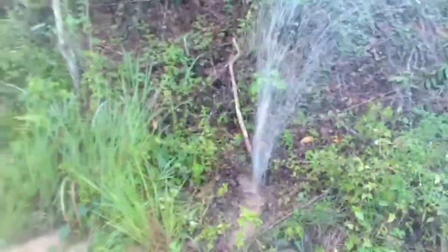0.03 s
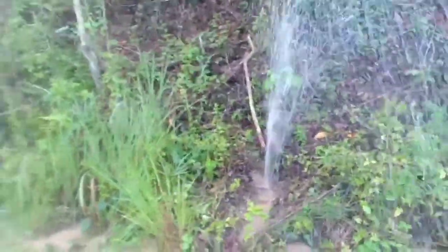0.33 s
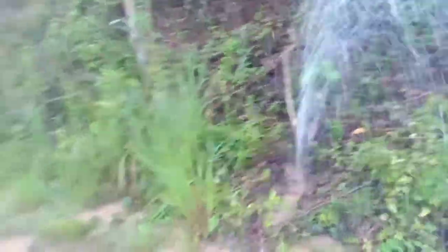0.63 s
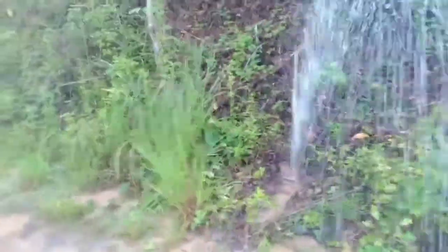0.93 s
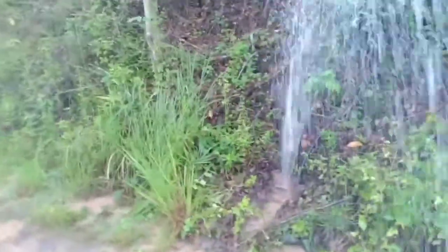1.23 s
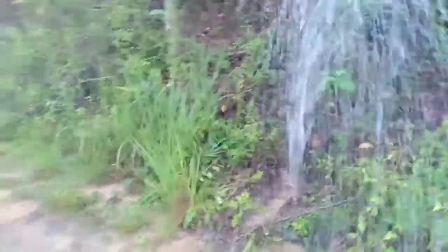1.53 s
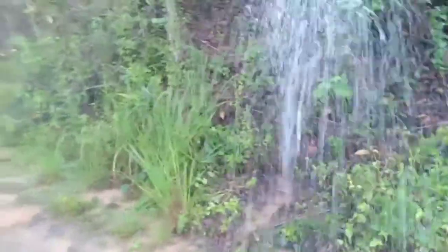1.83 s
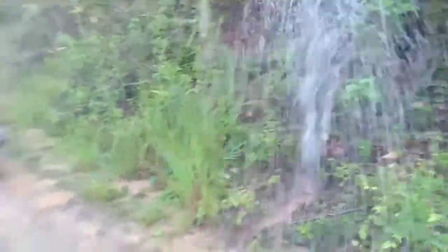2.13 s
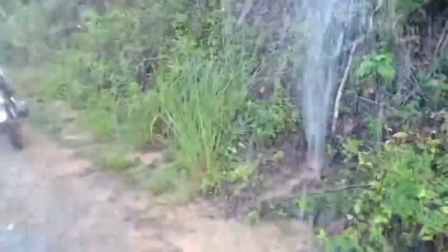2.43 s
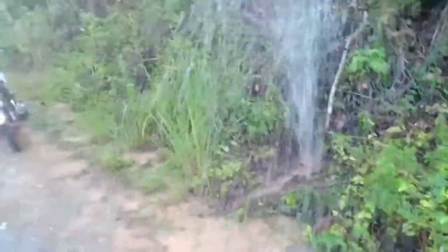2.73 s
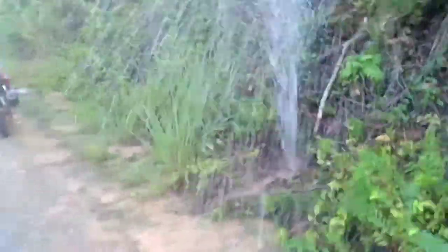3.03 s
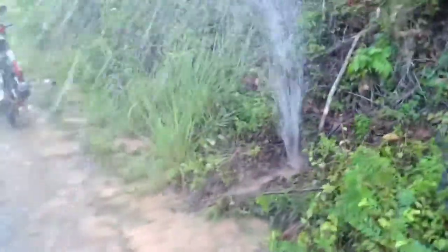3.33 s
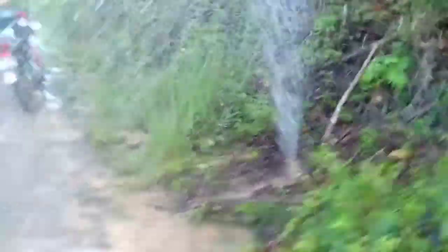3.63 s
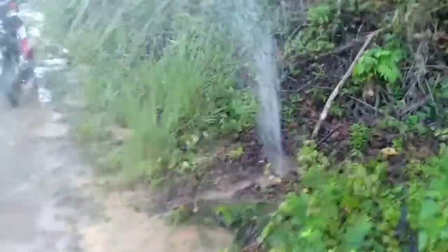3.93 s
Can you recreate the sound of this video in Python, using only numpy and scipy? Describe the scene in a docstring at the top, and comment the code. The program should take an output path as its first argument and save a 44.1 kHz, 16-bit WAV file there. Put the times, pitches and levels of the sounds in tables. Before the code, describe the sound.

A jet of water from a burst pipe hisses continuously outdoors, its spray splattering on plants and ground. Scattered droplets strike the hand-held microphone with short, sharp ticks, and the fine fizz drifts slightly from left to right.

```python
"""Spray from a broken pipe

Water jets from a broken pipe beside a dirt road: it hisses, and patters down on leaves and soil.
Stray drops strike the hand-held camera by its two microphone ports, which ring briefly.
As the camera turns, the finest fizz drifts to the right and the low rush to the left.
Three scuffs excite the modes of its case, and a faint low tone slides down once."""
import sys
import numpy as np
from scipy import signal
from scipy.fft import rfft, irfft, next_fast_len
from scipy.io import wavfile
from scipy.ndimage import map_coordinates

SR = 44100
rng = np.random.default_rng(int(sys.argv[2]) if len(sys.argv) > 2 else 0)


def generate_wav(signal):
    """Clip the signal to [-1, 1] and save it as 16-bit WAV at the path in sys.argv[1]."""
    frames = np.transpose(np.atleast_2d(signal))
    scaled = np.clip(frames, -1, 1) * 32767
    pcm = np.round(scaled).astype(np.int16)
    wavfile.write(sys.argv[1], SR, pcm)


N = 176400

# response of the two ports to close spray: frequency_hz, left_relative_db, right_relative_db
PORT_RESPONSE = [(98, -37, -47), (670, -28, -21), (1390, -14, -19), (1880, -3.5, -9), (2470, 1.5, -6),
                 (3830, -3.5, -5.5), (4490, -8.5, -3.5), (5230, 0, 3.5), (5890, 1.5, 0), (6920, -6, -7.5),
                 (7600, -11.5, -10.5), (10130, -13.5, -13.5), (11600, -8, -18), (12300, -12, -11.5),
                 (13700, -5, -13.5), (14300, -8.5, -9.5), (15800, -13.5, -11)]
# spectrum of the jet and of water on soil: frequency_hz, relative_db
RUSH_SPECTRUM = [(25, -9), (60, -20), (100, -15), (150, -8), (220, -0.5), (370, 1), (600, -3.5), (1000, -5),
                 (1600, -11.5), (3000, -35)]
# likeness of the rush at the two ports: frequency_hz, correlation
RUSH_COHERENCE = [(60, 0.76), (200, 0.98), (400, 0.99), (700, 0.94), (1500, 0.38)]
# flurries of small droplets on the camera: centre_s, half_length_s, level_db
FLURRY_SWELLS = [(0.123, 0.013, -28.5), (0.476, 0.045, -34), (1.856, 0.045, -34.5)]
# large drops on the camera: time_s, tap_relative_db, pitch_hz, splash_relative_db
DROP_IMPACTS = [(0.084, -10.5, 2410, -35), (0.1987, 0, 2500, -28), (.278, -8, 2620, -28.5),
                (.348, -13, 2950, -38.5), (0.363, -11, 2520, -44), (0.4298, -13.5, 2700, -42),
                (0.4377, -16, 2620, -36), (.4555, -10, 2540, -33), (0.4744, -12.5, 2410, -31),
                (0.4827, -18, 2530, -30), (.5014, -16, 2930, -18), (.509, -16, 2400, -26),
                (0.6125, -14, 2520, -22), (.6712, -21, 2840, -28), (0.7232, -7, 2760, -29),
                (0.7566, -6.5, 2520, -39), (1.142, -9.5, 2520, -28.5), (1.3004, -14.5, 2340, -32),
                (1.481, -8, 2110, -42), (1.4855, -11, 2770, -39), (1.4926, -5, 2410, -35),
                (1.518, -10, 2430, -41), (1.548, -23, 2300, -23), (1.551, -9.5, 2030, -35),
                (1.569, -10, 2060, -32), (1.582, -9.5, 2460, -27.5), (1.5947, -11, 2740, -33),
                (1.662, -12, 2910, -38), (1.665, -9, 2940, -31), (1.7096, -3.5, 2380, -27),
                (1.7195, -10.5, 2260, -37), (1.9482, -10.5, 2900, -37), (2.079, -16, 2900, -32),
                (2.0994, -22, 2830, -27), (2.263, -3.5, 2900, -21), (2.282, -4.5, 2040, -25.5),
                (2.3094, -10, 1720, -31), (2.3328, -9.5, 1970, -36), (2.3495, -8, 2680, -35),
                (2.3588, -9, 2570, -38), (2.3699, -4.5, 2500, -37), (2.3904, -7.5, 2550, -37),
                (2.4137, -15, 2700, -29), (2.4232, -12, 2580, -39), (2.4828, -8.5, 2630, -31),
                (2.515, -9, 2750, -34), (2.6535, -12.5, 2600, -29.5), (2.6772, -7.5, 2700, -39),
                (2.7362, -11.5, 2780, -40), (2.7632, -7.5, 2920, -31), (2.8536, -5, 2500, -30.5),
                (2.914, -11, 2520, -39), (2.9183, -4.5, 2570, -42), (2.9264, -9.5, 2710, -34),
                (3.01, -3, 2000, -31), (3.019, -8, 2820, -34), (3.031, 0, 2780, -26.5),
                (3.0913, -12.5, 2550, -28.5), (3.1126, -3, 2430, -40), (3.1262, -14, 2320, -26),
                (3.1782, -12, 2700, -48), (3.192, -12.5, 2490, -39), (3.2437, -14, 2540, -21),
                (3.3463, -11.5, 2030, -42), (3.3849, -2, 2310, -42), (3.5079, -9, 2640, -38),
                (3.58, -10.5, 2480, -39), (3.592, -21, 3000, -26), (3.642, -40, 2630, -28.5),
                (3.775, -7, 2740, -28), (3.8297, -12.5, 1980, -32), (3.8887, -4.5, 2340, -29.5),
                (3.9756, -9, 2690, -24)]
# gain on the low body of the large drops: time_s, gain_db
DROP_BODY_GAIN = [(.8, -16), (1.55, 3.5), (3.2, -2)]
# rubs on the case: centre_s, half_length_s, level_db
CASE_SCUFFS = [(1.018, 0.0093, -37), (2.408, 0.013, -35), (3.703, 0.022, -41)]
# modes of the case: frequency_hz, bandwidth_hz, relative_db
CASE_MODES = [(395, 58, -9), (704, 98, 3.5), (990, 140, 3.5), (1380, 100, 8), (1790, 120, 4),
              (2300, 160, 1), (2760, 150, -20)]
# gain on the treble as the camera turns: time_s, left_db, right_db
TREBLE_GAIN = [(0, 1.5, -3), (.8, 1, -5), (1.3, 3, -2), (2.2, 3.5, 1), (3, 0.5, 0.5), (4, -1, 2.5)]

SPLASH_TOP_HZ, SPATTER_TOP_HZ = 6820, 4200
TIME_S = np.arange(N) / SR


def amp(db):
    """Amplitude grows tenfold for every 20 decibels."""
    return 10 ** (np.asarray(db) / 20)


def unit(x):
    """Normalisation to an rms of 1."""
    return x / np.sqrt(np.mean(x ** 2) + 1e-20)


def spectrum_at(table, hz):
    """Interpolation of each column on a logarithmic frequency axis."""
    knots_hz, *columns = np.transpose(table)
    return np.array([np.interp(np.log(hz + 1), np.log(knots_hz + 1), column) for column in columns])


def curves(table):
    """Linear interpolation of each column in time."""
    knots_s, *columns = np.transpose(table)
    return np.array([np.interp(TIME_S, knots_s, column) for column in columns])


def swells(table):
    """Superposition of Gaussian envelopes."""
    return sum(amp(db) * np.exp(-((TIME_S - centre_s) / half_s) ** 2) for centre_s, half_s, db in table)


def wobble(knots_per_s):
    """Smooth random modulation: a spline through bounded random values, rms 1."""
    knots = np.tanh(rng.standard_normal(2048))
    return unit(map_coordinates(knots, [TIME_S * knots_per_s], mode="wrap"))


def lowpass(hz, edge_hz):
    """Gain of a low-pass filter that falls 48 dB an octave above its edge."""
    return 1 / (1 + (hz / edge_hz) ** 8)


def filtered(x, response):
    """Linear filtering multiplies the spectrum by a frequency response."""
    size = 2 * next_fast_len(N // 2 + SR // 10)
    return irfft(rfft(x, size) * response(np.fft.rfftfreq(size, 1 / SR)), size)[..., :N]


def add(track, start_s, sound):
    """Superposition of a short stereo sound on a track."""
    start = max(round(start_s * SR), 0)
    part = track[:, start:start + sound.shape[1]]
    part += sound[:, :part.shape[1]]


def ports(hz):
    """The resonances of the two ports form minimum-phase filters of mean power 1."""
    magnitude = unit(amp(spectrum_at(PORT_RESPONSE, hz)))
    cepstrum = irfft(np.log(magnitude))
    half = cepstrum.shape[1] // 2
    cepstrum[:, 1:half] *= 2  # folding the cepstrum makes the response causal
    cepstrum[:, half + 1:] = 0
    return np.exp(rfft(cepstrum))


def impacts(per_s, spread_db):
    """Independent impacts form a Poisson process, here with capped log-normal sizes."""
    size = amp(spread_db * np.minimum(rng.standard_normal(N), 2))
    return (rng.random(N) < per_s / SR) * size * rng.choice([-1, 1], N)


def ticks(shared_per_s, spread_db, decay_s):
    """Decaying noise bursts add in power; each port hears the shared ones and as many of its own."""
    own = np.array([impacts(shared_per_s, spread_db) for _ in range(2)])
    shared = impacts(shared_per_s, spread_db)
    power = signal.lfilter([1], [1, -np.exp(-2 / (decay_s * SR))], shared ** 2 + own ** 2)
    return unit(np.sqrt(power) * rng.standard_normal((2, N)))


def spray(flutter_db=1.5):
    """The jet hisses as broadband noise; water on leaves and fine mist add shot noise."""
    hiss = rng.standard_normal((2, N)) * amp(flutter_db * wobble(45))
    patter = ticks(shared_per_s=190, spread_db=10.5, decay_s=0.0014)
    patter = filtered(patter, lambda hz: np.sqrt(lowpass(hz, SPLASH_TOP_HZ)))
    mist = ticks(shared_per_s=130, spread_db=6.5, decay_s=0.0018)
    mist = filtered(mist, lambda hz: 1 - lowpass(hz, edge_hz=6600))
    hiss_and_patter = filtered(amp(-35.5) * hiss + amp(-36.5) * patter, ports)
    return hiss_and_patter + amp(-41.5) * unit(filtered(mist, ports))


def rush(level_db=-52, flutter_db=1.78):
    """The jet and water drumming on soil make low noise that is largely coherent at the two ports."""
    def mid_and_side(hz):
        """The balance of sum and difference sets the correlation between the channels."""
        angle = np.arccos(np.clip(spectrum_at(RUSH_COHERENCE, hz)[0], -1, 1)) / 2
        return amp(spectrum_at(RUSH_SPECTRUM, hz)) * [np.cos(angle), np.sin(angle)]

    mid, side = filtered(rng.standard_normal((2, N)), mid_and_side)
    return amp(level_db + flutter_db * wobble(25)) * unit(np.array([mid + side, mid - side]))


def tap(pitch_hz, ring_cycles=1.13, rise_share=0.59, right_db=-9, right_lead_s=0.00008):
    """An impact excites a damped oscillation of the ports, which peaks 5 ms in."""
    t = np.arange(-SR // 200, SR // 100) / SR + np.array([[0], [right_lead_s]])
    stretch = np.exp(0.16 * rng.standard_normal())  # ring time scatters from tap to tap
    age = t * pitch_hz / (ring_cycles * stretch)  # in ring times
    attenuation = np.where(t < 0, (age / rise_share) ** 2, np.hypot(age, 0.5) - 0.5)
    envelope = np.exp(-attenuation) / np.sqrt(stretch)
    return amp([[0], [right_db]]) * envelope * np.cos(2 * np.pi * (pitch_hz * t + rng.random()))


def droplets(count, pitch_hz, log_pitch_spread, spread_db):
    """Small impacts at random times superpose into a crackle of rms 1."""
    taps = np.zeros((2, N))
    starts_s = rng.uniform(0, N / SR, count)
    deviations = np.clip(rng.standard_normal((count, 2)), -2, 1.5)
    for start_s, (size, detune) in zip(starts_s, deviations):
        add(taps, start_s, amp(spread_db * size) * tap(pitch_hz * np.exp(log_pitch_spread * detune)))
    return unit(filtered(taps, lambda hz: 1 - lowpass(hz, edge_hz=1610)))


def shower(sprinkle_db=-43):
    """A thin sprinkle taps the camera; in flurries the finest impacts overlap into a wash of noise."""
    sprinkle = droplets(count=330, pitch_hz=2860, log_pitch_spread=0.19, spread_db=5.5)
    dense = droplets(count=900, pitch_hz=2430, log_pitch_spread=0.24, spread_db=8.5)
    noise = rng.standard_normal((2, N))
    wash = unit(filtered(noise, lambda hz: ports(hz) * lowpass(hz, SPLASH_TOP_HZ)))
    return amp(sprinkle_db) * sprinkle + swells(FLURRY_SWELLS) * unit(dense + amp(1) * wash)


def drops(splash_decay_s=0.00043, spatter_lead_s=0.008, spatter_rise_s=0.0028, spatter_decay_s=0.018):
    """Each large drop excites the ports on impact, bursts in a splash and throws off a spatter."""
    taps, water = np.zeros((2, 2, N))
    t = np.arange(4096) / SR
    bins_hz = np.fft.rfftfreq(len(t), 1 / SR)
    colour = ports(bins_hz)
    age_s = t - spatter_lead_s  # some fine droplets arrive just ahead of the drop
    cloud = np.exp(np.minimum(age_s / spatter_rise_s, -age_s / spatter_decay_s))

    def burst(envelope, top_hz):
        """A noise transient filtered by the ports, with energy 1 in each."""
        noise = rng.standard_normal((2, len(t))) * envelope
        heard = irfft(rfft(noise) * colour * np.sqrt(lowpass(bins_hz, top_hz)))
        return heard / np.linalg.norm(heard, axis=1, keepdims=True)

    for time_s, tap_db, pitch_hz, splash_db in DROP_IMPACTS:
        add(taps, time_s - 0.005, amp(tap_db - 0.36) * tap(pitch_hz))
        splash = burst(np.sqrt(t) * np.exp(-t / splash_decay_s), SPLASH_TOP_HZ)
        spatter = burst(rng.standard_normal(len(t)) ** 2 * cloud, SPATTER_TOP_HZ)
        splash_gain = amp(splash_db + 23.5) * amp([[0], [1]])  # 1 dB stronger on the right
        spatter_gain = np.hypot(amp(tap_db), amp(splash_db + 17.5))  # grows with tap and splash
        add(water, time_s, splash_gain * splash)
        add(water, time_s - spatter_lead_s, spatter_gain * spatter)
    hits = filtered(taps, lambda hz: hz ** 2 / (hz ** 2 + 915 ** 2)) + water  # taps carry little bass
    body = filtered(hits, lambda hz: lowpass(hz, edge_hz=1520))
    return hits + (amp(curves(DROP_BODY_GAIN)) - 1) * body


def case_response(hz):
    """Modal superposition: the case responds as a sum of damped resonators of alternating sign."""
    return sum((-1) ** k * amp(db) * 1j * hz * width_hz / (mode_hz ** 2 - hz ** 2 + 1j * hz * width_hz)
               for k, (mode_hz, width_hz, db) in enumerate(CASE_MODES))


def scuffs():
    """Friction, a dense train of tiny impacts, drives the modes of the case."""
    grit = impacts(per_s=1200, spread_db=1)
    return swells(CASE_SCUFFS) * unit(filtered(grit, case_response))


def low_glide(start_s=1.882, start_hz=172, fall_per_s=7.1, rise_s=0.026, peak_db=-47.5):
    """A faint sinusoid swells and fades while its frequency falls exponentially."""
    age_s = np.maximum(TIME_S - start_s, 0)
    envelope = (age_s / rise_s * np.exp(1 - age_s / rise_s)) ** 2
    pitch_hz = start_hz * np.exp(-fall_per_s * age_s)
    return amp(peak_db) * envelope * np.sin(2 * np.pi * np.cumsum(pitch_hz) / SR)


def pan_treble(x):
    """Level difference: as the camera turns, the treble moves from the left port to the right."""
    treble = filtered(x, lambda hz: 1 - lowpass(hz, edge_hz=7200))
    return x + (amp(curves(TREBLE_GAIN)) - 1) * treble


def shift_arrival(x, left_lead_s=-0.00029, drift_s_per_s=0.0001):
    """Arrival-time difference: as the camera turns, the sound drifts from right of centre to left."""
    shift_s = (left_lead_s + drift_s_per_s * TIME_S) / 2
    left = np.interp(TIME_S + shift_s, TIME_S, x[0])
    right = np.interp(TIME_S - shift_s, TIME_S, x[1])
    return np.array([left, right])


def scene():
    """In the open air the sources superpose at the ports without reverberation."""
    return pan_treble(spray() + drops()) + shower() + shift_arrival(rush()) + scuffs() + low_glide()


def record(dry):
    """Band limiting: the camera passes nothing above 15.7 kHz."""
    return filtered(dry, lambda hz: hz < 15700)


dry = scene()
out = record(dry)
generate_wav(out)
```